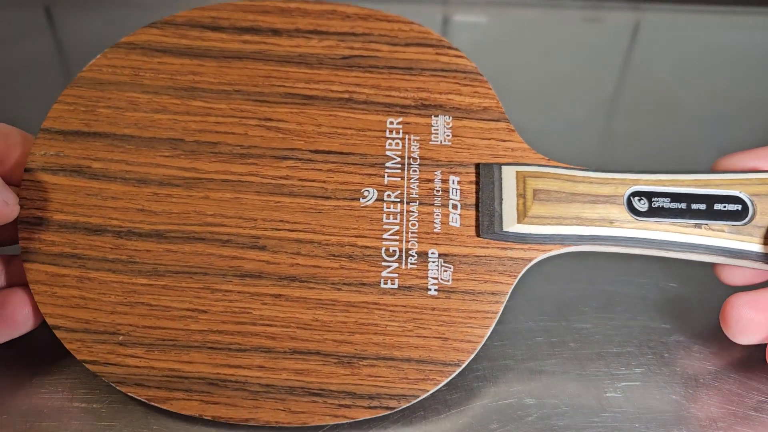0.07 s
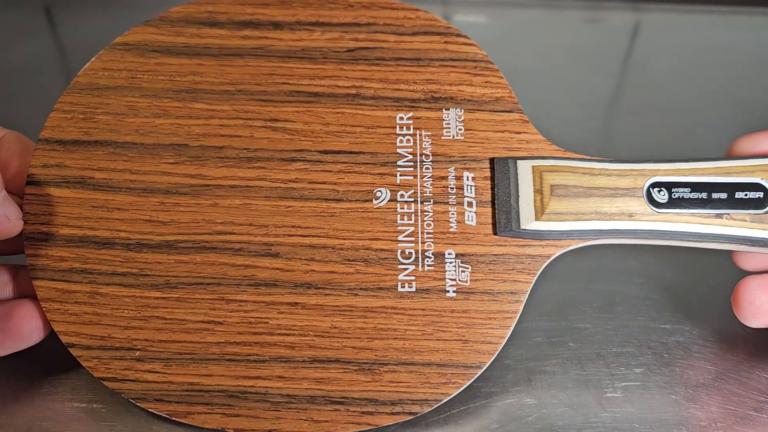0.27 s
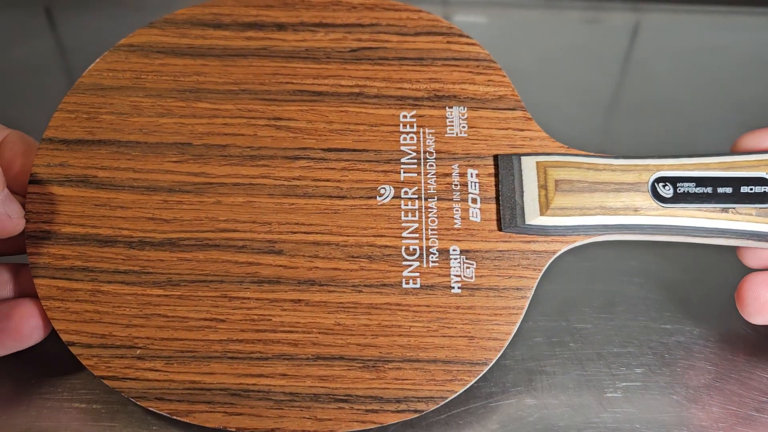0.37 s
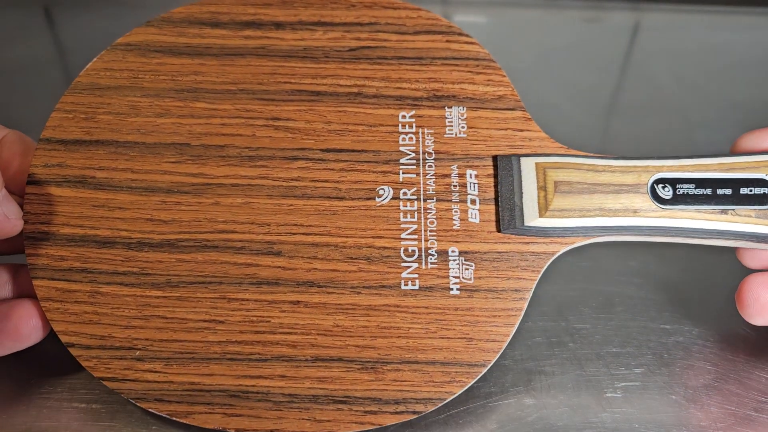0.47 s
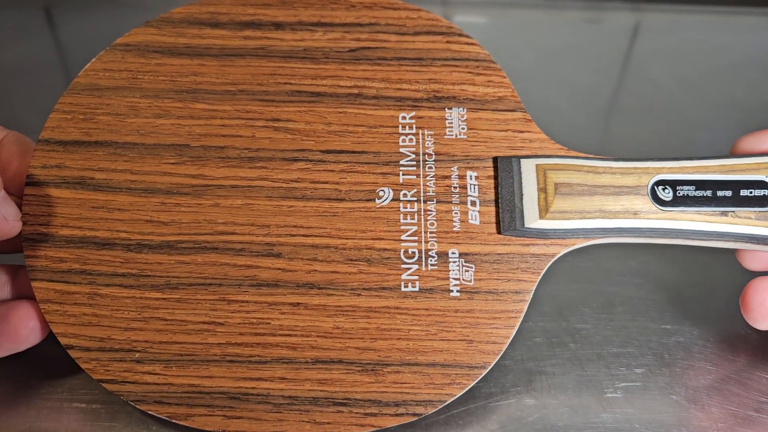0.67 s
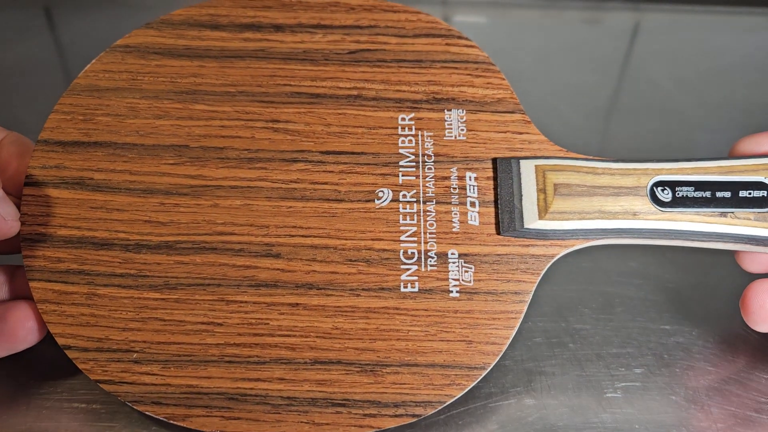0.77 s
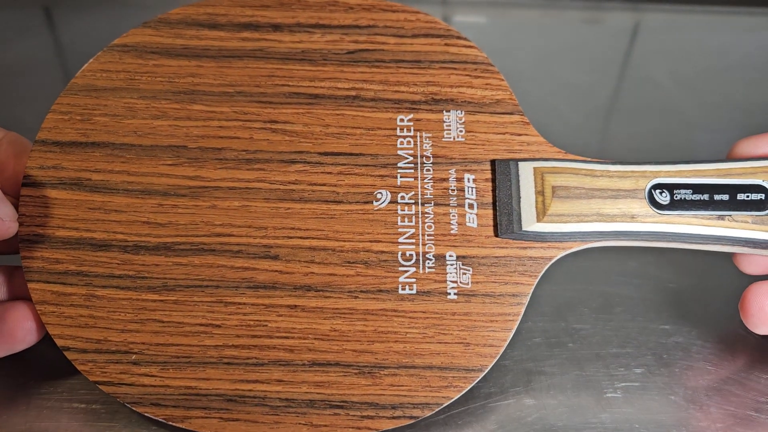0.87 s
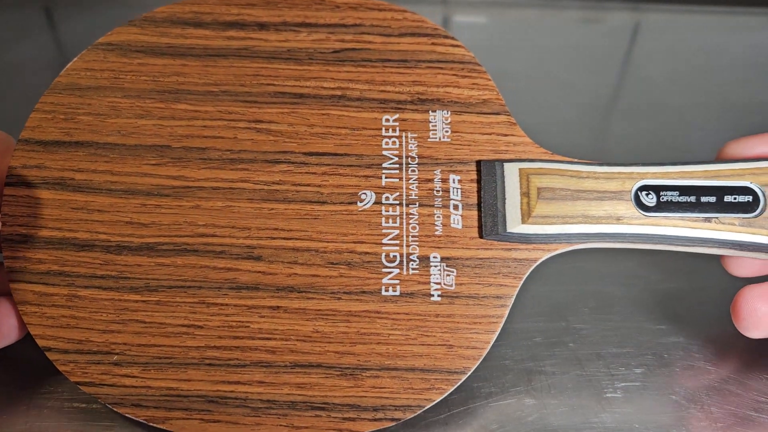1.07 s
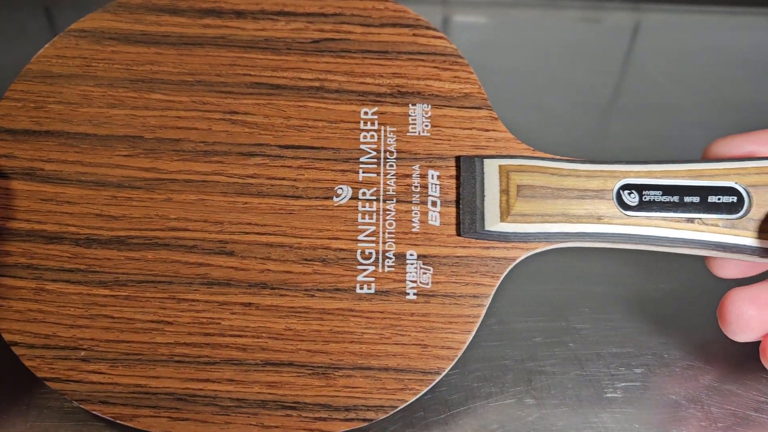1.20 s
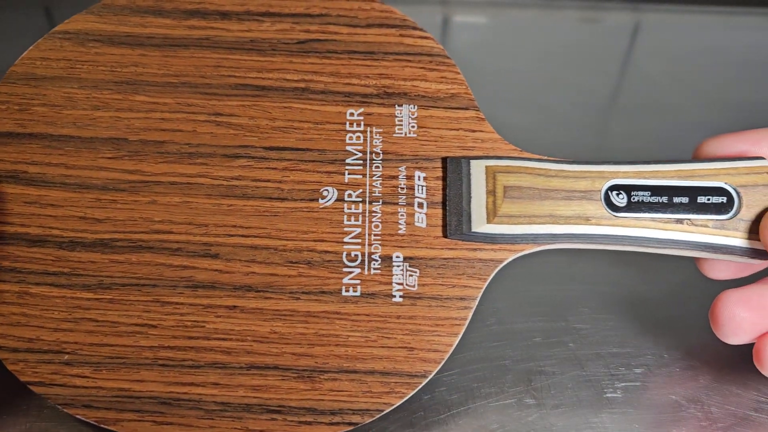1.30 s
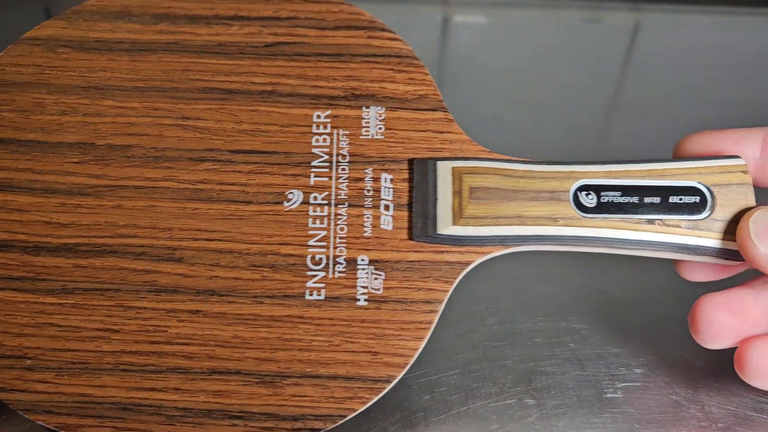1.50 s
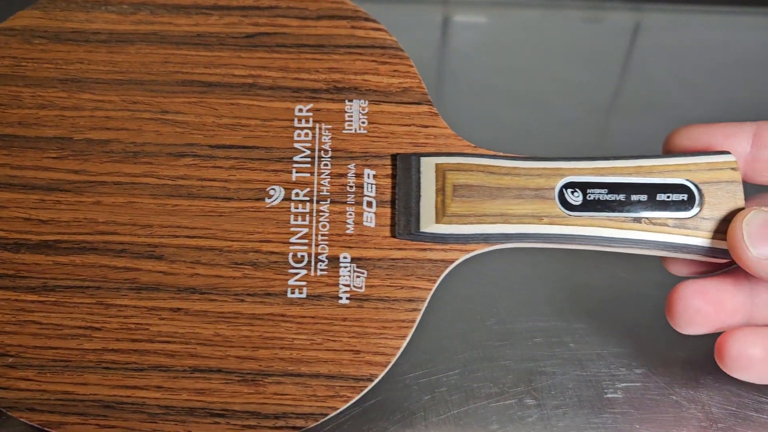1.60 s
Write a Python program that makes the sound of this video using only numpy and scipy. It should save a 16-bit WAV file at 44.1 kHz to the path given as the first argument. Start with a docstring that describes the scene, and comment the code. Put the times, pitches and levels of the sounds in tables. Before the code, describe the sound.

One dull knock on a wooden table tennis paddle, with faint handling in a quiet room.

```python
"""Table-tennis blade knock

A bare wooden blade is turned in the hands and knocks once, dully, in a small quiet room. Two quick
contacts drive a dead thud and a brief ring of the plies, and the room answers with echoes and a boom.
The handling adds soft friction rustles, one just ahead of the knock, and a few small ticks after it.
Under it all sits a bed of room tone, appliance hum and a deep drone that swells and sinks."""
import sys
import numpy as np
from scipy import signal
from scipy.fft import rfft, irfft
from scipy.io import wavfile

SR = 44100
rng = np.random.default_rng(int(sys.argv[2]) if len(sys.argv) > 2 else 0)


def wav_record(signal):
    """Record a signal, one row per channel, as 16-bit PCM in the file named by sys.argv[1]."""
    frames = np.transpose(np.atleast_2d(signal))
    bounded = np.clip(frames, -1, 1)
    # unit amplitude maps onto the largest positive 16-bit level
    quanta = np.round(bounded * 32767).astype(np.int16)
    wavfile.write(sys.argv[1], SR, quanta)


N = 72765
T, HZ = np.arange(N) / SR, np.fft.rfftfreq(N, 1 / SR)

# how alike left and right are in diffuse sound: freq_hz, correlation
STEREO_LIKENESS = [(60, 0.88), (150, 0.9), (300, 0.76), (600, 0.2), (1200, 0), (2500, 0.01), (12000, 0)]
# decay of the reverb tail: freq_hz, t60_s
REVERB_DECAY = [(100, 0.65), (300, 0.6), (650, 0.39), (1200, 0.39), (2500, 0.48), (5000, 0.26),
                (12000, 0.51)]
# tone of the reverb: freq_hz, gain_db
REVERB_EQ = [(60, -3.5), (150, -1), (350, 1), (650, 0.5), (950, -6.5), (1400, 0.5), (2500, 1.5), (4500, 0),
             (5600, 2), (8000, -3.5)]
EARLY_DB, EARLY_T60_S, PREDELAY_S = -3.5, 0.055, 0.00071

# colour of the room tone: freq_hz, gain_db
ROOM_TONE_EQ = [(20, -31.5), (38, -25.5), (64, -14.5), (100, -10.5), (170, -10), (225, -6.5), (323, -17.5),
                (415, -18), (500, -25.5), (570, -26), (850, -36), (1100, -30), (1330, -29.5), (1550, -43),
                (2000, -42.5), (3000, -42), (4000, -49.5), (5000, -48.5), (6200, -61.5), (9500, -66.5),
                (13000, -63.5), (15500, -60.5)]
# partials of the appliance hum: pitch_hz, level_db, waver_share
HUM_PARTIALS = [(49, -76, 0.77), (147.5, -65.5, 0.55), (223.7, -68.5, 0.79), (298.7, -77, 1),
                (405, -78, 0.98), (1040.5, -83, 0.54), (1211, -87, 1), (7820, -106, 0.57)]
# swells and dips of the drone: time_s, level_db
DRONE_SWELLS = [(0.0, -55.5), (0.114, -54.5), (0.17, -74.5), (0.238, -54), (0.358, -71), (0.766, -56.5),
                (0.798, -75), (0.922, -63), (0.96, -73), (1.024, -60), (1.066, -78), (1.106, -60.5),
                (1.272, -59), (1.322, -69.5), (1.374, -63), (1.47, -54), (1.502, -73.5), (1.65, -62.5)]
ROOM_TONE_DB, WAVER_HZ, DRONE_HZ, BED_PAN_DB = -60.5, 6.85, 99.54, 1.43

# slides of the hands: start_s, rise_s, hold_s, fall_s, level_db, pan_db, tilt_db_per_octave
RUSTLE_STROKES = [(-.03, 0.023, 0.0057, 0.042, -62.5, -1, -4),
                  (0.945, 0.016, 0.049, 0.016, -64, -1.5, -2.5),
                  (1.448, 0.019, 0.024, 0.0061, -77.5, -1, -1), (1.608, 0.026, 0.01, .01, -87.5, -16, -1)]
# broad colour of the friction: freq_hz, gain_db
RUSTLE_EQ = [(500, -15.5), (1000, -14), (1400, -2.5), (2600, -6), (3300, -1), (4300, -12.5), (5600, -19.5),
             (6300, -9.5), (8700, -12.5), (9500, -35), (12500, -19.5), (15500, -23)]
# resonances on top of that colour: centre_hz, width_hz, boost_db
RUSTLE_RESONANCES = [(1340, 130, 8.5), (1738, 42, 8.5), (2070, 100, 8.5), (3255, 87, 2), (4800, 150, 19),
                     (7206, 170, 14), (8750, 130, 1), (10600, 250, 12.5)]
RUSTLE_GRAIN_DB, RUSTLE_SEND_DB, TILT_FROM_HZ = 5, -1, 1000

# the two contacts of the one knock: start_s, level_db, contact_s
KNOCK_CONTACTS = [(0.2192, 1, 0.000056), (0.2223, -11.5, 0.000096)]
# ringing modes of the blade: pitch_hz, level_db, t60_s
BLADE_MODES = [(147, -35.5, 0.17), (185.3, -32, 0.095), (538, -51.5, 0.17), (1300, -44, 0.069),
               (1392, -39, 0.049), (2150, -37, 0.043), (2807, -42.5, 0.093), (3180, -51, 0.017),
               (3550, -49, 0.025), (4430, -37, 0.023), (5400, -54.5, 0.038), (6160, -65, .03),
               (7400, -78, 0.034)]
# colour of the dead thud: freq_hz, gain_db
THUD_EQ = [(30, -33), (70, -17), (115, 5.5), (250, -0.5), (450, -1), (650, 0), (950, -5.5), (1400, -6),
           (2200, -14.5), (3600, -17.5), (4700, -14.5), (5600, -25.5), (6600, -30), (7600, -28),
           (9000, -66.5), (14000, -72.5)]
# reflections off nearby surfaces: delay_s, left_db, right_db
NEAR_ECHOES = [(.0058, -9.5, -15), (.0086, -18, -11)]
# standing waves of the room: pitch_hz, level_db, t60_s, pan_db
ROOM_MODES = [(124.6, -48, 0.56, 4), (153.4, -45.5, 0.19, -3.5), (215, -41, 0.71, 3.5),
              (308.8, -47.5, 0.35, 0.5), (356.4, -44, 0.54, 3.5), (407, -40, 0.44, -1), (588, -45, .33, 0),
              (667.3, -46.5, 0.46, 8.5), (696.4, -49, 0.43, 6.5)]
SPREAD_S, SPREAD_HZ = 0.00026, 870  # bending waves of this frequency arrive this late
KNOCK_PAN_DB, RIGHT_LAG_S, BOOM_RISE_S = 4, 0.00007, 0.0183
THUD_SEND_DB, RING_SEND_DB = 7, -11.5
KNOCK_LOW_CUT_HZ, KNOCK_TOP_HZ = 88, 8000  # the wood radiates next to nothing above the top

# ticks of the grip: start_s, level_db, pan_db, ring1_db, ring2_db, ring3_db, ring4_db, snap_db, edge_hz
GRIP_TICKS = [(1.0118, -72, -9, -8, -7, -6, 1, 12, 14100),
              (1.0155, -57, -7.5, -20, -22, -6.5, 0.5, -4, 13000),
              (1.3088, -63, -6.5, 3, -2, -10, -2.5, -3, 6700),
              (1.3182, -59.5, -10, 7, -9, -26, -20, -10, 6000),
              (1.4985, -63, -6.5, 6, 2.5, -7.5, -9.5, -11.5, 6900)]
# the four rings of a tick: pitch_hz, t60_s
TICK_RINGS = [(1410, 0.031), (2810, 0.045), (6100, 0.036), (7400, 0.025)]
TICK_RISE_S, TICK_WIDTH_HZ, SNAP_T60_S, TICK_SEND_DB = 0.003, 93, 0.05, -7.5

HIGH_CUT_HZ = 15650


def amp(db):
    """Decibels to gain."""
    return 10 ** (np.asarray(db) / 20)


def unit_rms(x):
    """Scales to rms 1."""
    return x / np.sqrt(np.mean(abs(x) ** 2) + 1e-30)


def curve(points, hz):
    """Reads a table on a log-frequency axis."""
    freqs, values = np.transpose(points)
    return np.interp(np.log(hz + 1), np.log(freqs), values)


def pan(db):
    """Left and right gains; positive leans left."""
    return amp([[db / 2], [-db / 2]])


def decay(t, t60):
    """Exponential fade, 60 dB down at t60."""
    return 1000 ** (-t / t60)


def eq(x, db):
    """Filters by a gain for each frequency."""
    return irfft(rfft(x) * amp(db), N)


def convolve(x, response):
    """Convolution, cut to the scene's length."""
    return signal.fftconvolve(np.atleast_2d(x), np.atleast_2d(response), axes=1)[:, :N]


def tight_pulse(colour, size=4096):
    """The sharpest causal pulse with a given colour."""
    log_gain = np.log(amp(curve(colour, abs(np.fft.fftfreq(size, 1 / SR)))))
    return np.fft.ifft(np.exp(np.conj(signal.hilbert(log_gain)))).real[:size // 2]


def diffuse_noise():
    """Stereo white noise, narrow in the bass and wide in the treble."""
    mid, side = rfft(rng.standard_normal((2, N)))
    likeness = curve(STEREO_LIKENESS, HZ)
    mid, side = mid * np.sqrt((1 + likeness) / 2), side * np.sqrt((1 - likeness) / 2)
    return irfft(np.array([mid + side, mid - side]), N)


def reverb(x):
    """A short diffuse burst of early reflections, then a tail that dies band by band."""
    hz, t, bands = signal.stft(diffuse_noise(), SR, nperseg=256)
    bands = bands * decay(t, curve(REVERB_DECAY, hz)[:, None])
    tail = signal.istft(bands, SR, nperseg=256)[1][:, :N]
    early = diffuse_noise() * decay(T, EARLY_T60_S)
    response = tail / np.linalg.norm(tail[0]) + amp(EARLY_DB) * early / np.linalg.norm(early[0])
    return convolve(x, convolve(response * (T > PREDELAY_S), tight_pulse(REVERB_EQ)))


def room_tone():
    """A steady, dark wash of air."""
    return amp(ROOM_TONE_DB) * unit_rms(eq(diffuse_noise(), curve(ROOM_TONE_EQ, HZ)))


def appliance_hum():
    """Faint partials, each wavering on its own in level and phase."""
    smoothing = np.exp(-(np.fft.fftfreq(N, 1 / SR) / WAVER_HZ) ** 2)
    out = np.zeros(N)
    for hz, db, waver in HUM_PARTIALS:
        noise = rng.standard_normal(N) + 1j * rng.standard_normal(N)
        drift = unit_rms(np.fft.ifft(np.fft.fft(noise) * smoothing))
        partial = (1 - waver + waver * drift) * np.exp(2j * np.pi * hz * T)
        out += amp(db) * unit_rms(partial.real)
    return out


def drone():
    """One deep sine that swells and sinks."""
    swell = amp(np.interp(T, *np.transpose(DRONE_SWELLS)))
    return swell * unit_rms(np.sin(2 * np.pi * (DRONE_HZ * T + rng.random())))


def hand_rustles():
    """Hands slide on wood: short strokes of fine friction grains with a few resonances."""
    out = np.zeros((2, N))
    peaks_db = sum(db * np.exp(-((HZ - hz) / width) ** 2) for hz, width, db in RUSTLE_RESONANCES)
    colour_db = curve(RUSTLE_EQ, HZ) + peaks_db
    octaves = np.log2(np.maximum(HZ, TILT_FROM_HZ))
    for start, rise, hold, fall, db, pan_db, tilt in RUSTLE_STROKES:
        grains = diffuse_noise() * amp(RUSTLE_GRAIN_DB * np.minimum(rng.exponential(1, N), 5))
        friction = unit_rms(eq(grains, colour_db + tilt * octaves))
        attack = np.clip((T - start) / rise, 0, 1) ** 2
        release = np.exp(-np.maximum(T - start - rise - hold, 0) / fall)
        out += amp(db) * pan(pan_db) * attack * release * friction
    return out + amp(RUSTLE_SEND_DB) * reverb(out)


def contact_force():
    """Two quick pulses, smeared as bending waves cross the blade with the treble ahead."""
    force = np.zeros(N)
    for start, db, contact_s in KNOCK_CONTACTS:
        age = np.maximum(T - start, 0) / contact_s
        force -= amp(db) * age * np.exp(-age) / (contact_s * SR)
    lag_cycles = 2 * SPREAD_S * np.sqrt(SPREAD_HZ * HZ)
    return irfft(rfft(force) * np.exp(-2j * np.pi * lag_cycles), N)


def blade_knock():
    """The contacts drive a dead thud and the ring of the plies; the room answers."""
    force = contact_force()
    modes = sum(amp(db) * decay(T, t60) * np.sin(2 * np.pi * hz * T) for hz, db, t60 in BLADE_MODES)
    ring = convolve(force, modes)[0]
    thud = convolve(force, tight_pulse(THUD_EQ))[0]
    blade = ring + thud
    direct = np.array([blade, np.interp(T - RIGHT_LAG_S, T, blade)]) * pan(KNOCK_PAN_DB)
    echoes = sum(amp([[left_db], [right_db]]) * np.interp(T - delay, T, blade)
                 for delay, left_db, right_db in NEAR_ECHOES)
    send = amp(THUD_SEND_DB) * thud + amp(RING_SEND_DB) * ring
    knock = direct + echoes + room_boom(force) + reverb(send)
    knock = signal.sosfilt(signal.butter(10, KNOCK_TOP_HZ, fs=SR, output="sos"), knock)
    return signal.sosfilt(signal.butter(2, KNOCK_LOW_CUT_HZ, "high", fs=SR, output="sos"), knock)


def room_boom(force):
    """The knock sets standing waves going; they bloom and hang on."""
    waves = sum(amp(db) * pan(pan_db) * decay(T, t60) * np.sin(2 * np.pi * hz * T)
                for hz, db, t60, pan_db in ROOM_MODES)
    bloom = 1 - np.exp(-T / BOOM_RISE_S)
    return convolve(force, waves * bloom)


def grip_ticks():
    """Each tick of the grip is a noisy snap and four short, scuffed rings."""
    out = np.zeros((2, N))
    for start, db, pan_db, *rings_db, snap_db, edge_hz in GRIP_TICKS:
        age = np.maximum(T - start, 0)
        scuff = diffuse_noise()
        rings = np.zeros((2, N))
        for ring_db, (hz, t60) in zip(rings_db, TICK_RINGS):
            band_db = -20 * np.log10(1 + ((HZ - hz) / TICK_WIDTH_HZ) ** 2)
            rings += amp(ring_db) * decay(age, t60) * unit_rms(eq(scuff, band_db)) / np.sqrt(2)
        rolloff_db = -10 * np.log10(1 + (HZ / edge_hz) ** 8)
        snap = amp(snap_db) * decay(age, SNAP_T60_S) * eq(diffuse_noise(), rolloff_db)
        attack = np.minimum(age / TICK_RISE_S, 1)
        out += amp(db) * pan(pan_db) * attack * (rings + snap)
    return out + amp(TICK_SEND_DB) * reverb(out)


def scene():
    """The knock up front and soft handling, over a quiet bed."""
    foley = blade_knock() + hand_rustles() + grip_ticks()
    bed = room_tone() + appliance_hum() + drone()
    return foley + bed * pan(BED_PAN_DB)


def record(dry):
    """A steep high cut on the whole mix."""
    high_cut = signal.firwin(511, HIGH_CUT_HZ, window=("kaiser", 9), fs=SR)
    return signal.oaconvolve(dry, high_cut[None], "same")


dry = scene()
out = record(dry)
wav_record(out)
```